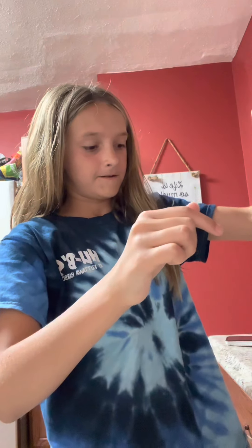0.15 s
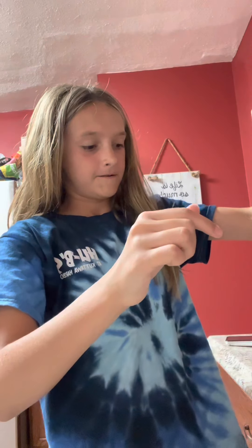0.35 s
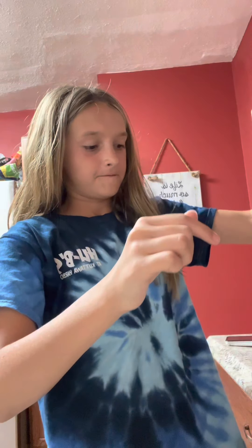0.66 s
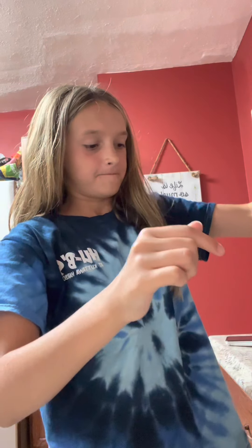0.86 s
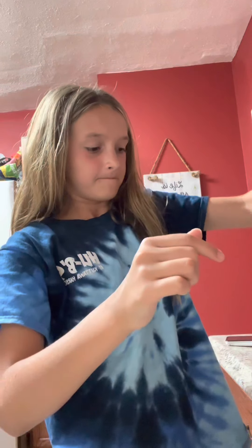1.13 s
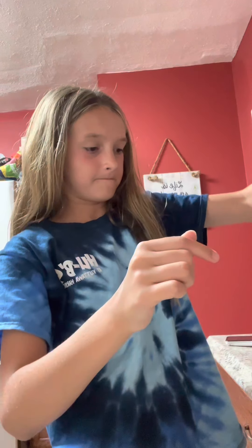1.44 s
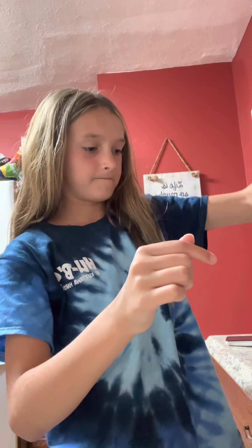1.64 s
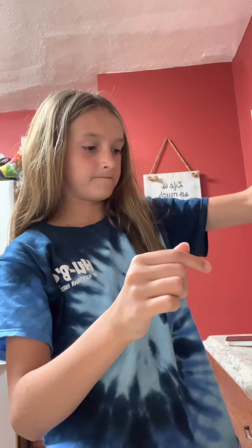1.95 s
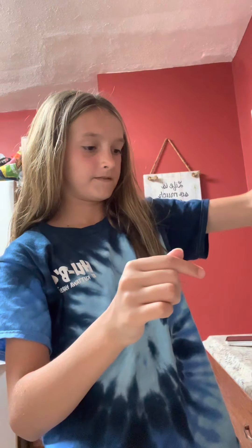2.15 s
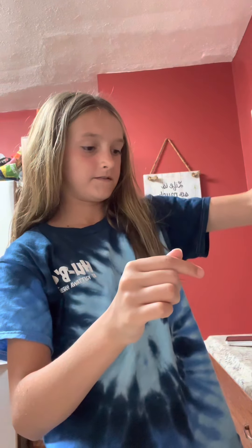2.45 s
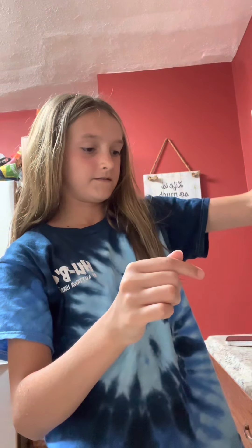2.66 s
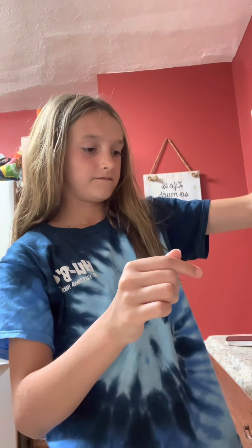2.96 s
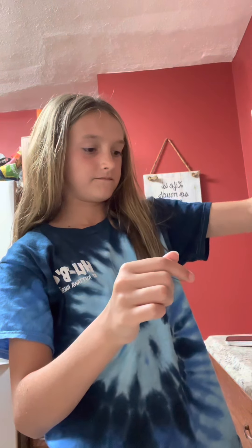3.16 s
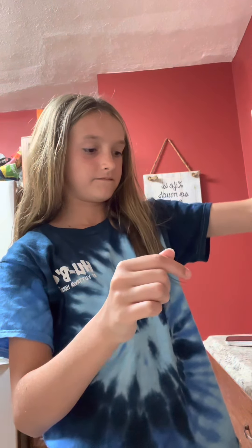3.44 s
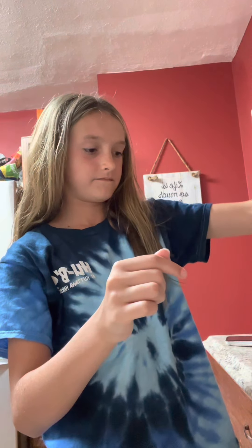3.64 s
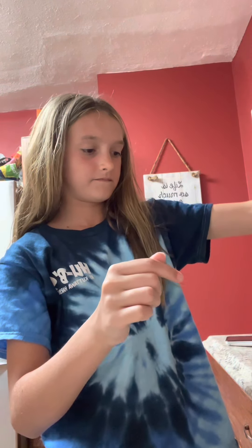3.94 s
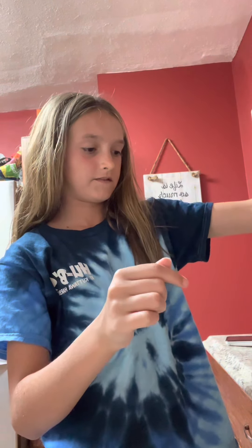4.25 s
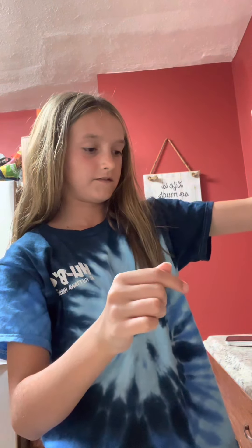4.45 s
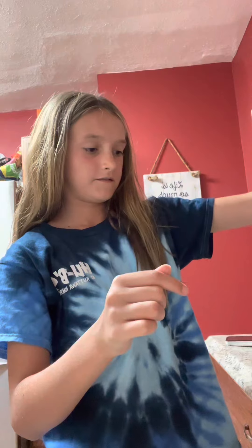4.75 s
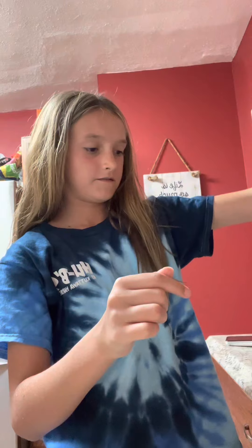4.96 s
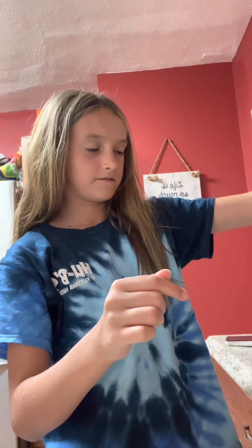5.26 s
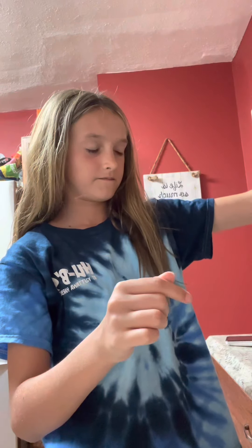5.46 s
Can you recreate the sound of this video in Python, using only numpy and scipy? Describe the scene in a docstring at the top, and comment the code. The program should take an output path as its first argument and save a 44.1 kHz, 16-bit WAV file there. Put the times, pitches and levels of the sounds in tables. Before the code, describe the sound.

Popcorn kernels rattle and knock in a shaken tub, busy rhythmic clusters thinning to scattered taps, then stopping over a steady appliance drone.

```python
"""In a kitchen, a tub of popcorn is shaken about six times a second, to the right of a phone.
Each stroke lands the heap on the wall as a cluster of kernels: noise bursts ring the wall modes and crackle.
Between strokes the heap slides and rustles; single hard kernels knock, and handfuls slip with a hiss.
An appliance drones behind as shaped noise; the left channel is weaker below 5 kHz and differs in phase."""
import sys
import numpy as np
from scipy import signal
from scipy.fft import rfft, irfft, next_fast_len
from scipy.io import wavfile
from scipy.ndimage import uniform_filter1d, map_coordinates

SR = 44100
rng = np.random.default_rng(int(sys.argv[2]) if len(sys.argv) > 2 else 0)


def dump(signal):
    """Clip the signal to [-1, 1] and save it as 16-bit WAV at the path in sys.argv[1]."""
    limited = np.clip(np.atleast_2d(signal).T, -1, 1)
    pcm = np.round(limited * 32767).astype(np.int16)
    wavfile.write(sys.argv[1], SR, pcm)


N = 246947
TIME_S = np.arange(N) / SR

# Appliance spectrum. Each row: frequency in Hz, relative density in dB per Hz.
DRONE_SPECTRUM = [(20, -16), (40, -38.5), (58, 1.5), (75, -11), (108, 2.5), (140, -5.5), (165, -9),
                  (260, -11), (400, -16), (800, -24), (1300, -24), (2500, -24), (4300, -42.5), (8000, -41),
                  (16000, -74)]
# Decay of the kitchen. Each row: frequency in Hz, time to fall 60 dB in s.
ROOM_DECAY = [(150, 0.24), (1000, 0.21), (5000, 0.33), (15000, 0.029)]
# Left channel against right; opposite in phase from 7.8 to 10.5 kHz.
# Each row: frequency in Hz, level in dB, likeness 0-1, phase lead in rad.
CHANNEL_RATIO = [(50, -.8, .998, 0), (170, -2, .975, 0), (340, -6.5, .9, -.2), (500, -11.5, .5, -.8),
                 (800, -9.5, .25, .8), (1300, -6, .45, 1.6), (1600, -8, .45, 1.1), (2600, -8, .84, 2.1),
                 (3100, -1.5, .58, 2.5), (4400, -1.5, .2, 3.9), (5500, 0, .65, 5.1), (6900, 0, .7, 4.5),
                 (7800, 0, 1, np.pi), (10500, 0, 1, np.pi), (11300, 0, .6, 1.9), (12500, 0, .85, .4),
                 (13200, 0, 1, 0)]
# Modes of the tub wall. Each row: frequency in Hz, width in Hz before a blow's damping, level in dB.
WALL_MODES = [(206, 57, -10), (294.5, 32.5, -5.5), (375, 54.5, -2.5), (412, 21, 1), (468.4, 25, -3),
              (588, 59, -2.5), (660.6, 48, -1.5), (702.5, 59, -4), (830, 86, -8.5), (1058, 87, -3),
              (1260, 505, -10), (1828, 300, -6), (2097, 195, -8), (2487, 462, -8.5)]
# Brittle flakes. Each row: frequency in Hz, relative density in dB per Hz.
CRACKLE_SPECTRUM = [(2000, -30), (3300, -4), (4400, -4), (5500, -7), (7700, -6), (9500, -5), (11000, -7),
                    (13000, -5), (16000, -8)]
# Sliding heap. Each row: frequency in Hz, relative density in dB per Hz.
RUSTLE_SPECTRUM = [(1000, -30), (2500, -3), (3600, 0), (4400, -3), (5200, -7), (6800, -9), (7700, -14),
                   (10000, -24), (16000, -40)]
# The heap slides. Each row: time in s, soft contacts in dB, hard contacts in dB,
# dry level in dB (the rustle).
SLIDE_LEVELS = [(0, -28.5, -31.5, -40.5), (.15, -43.5, -39.5, -49), (.35, -34.5, -36.5, -43.5),
                (.67, -41.5, -41.5, -49.5), (1.15, -37.5, -36, -43), (1.45, -44.5, -42, -48.5),
                (1.7, -45.5, -42, -46.5), (2.0, -42, -44.5, -52.5), (2.3, -43, -36.5, -44),
                (2.7, -42, -43, -52), (2.9, -51.5, -48, -51.5), (3.35, -46.5, -44.5, -54),
                (3.6, -39, -38, -46.5), (3.949, -46, -47.5, -50), (4.3, -40.5, -40.5, -46.5),
                (4.55, -48, -41.5, -51), (4.8, -46.5, -38.5, -43), (5.0, -52, -43, -47),
                (5.1, -62, -59.5, -58), (5.6, -68, -79, -67.5)]
# Handfuls slip down the wall. Each row: start in s, level in dB, fall in s, centre in Hz.
SLIPS = [(0.293, -43, 0.033, 3480), (1.049, -47.5, 0.16, 4730), (2.079, -43.5, 0.04, 4100),
         (2.201, -49.5, 0.055, 4240), (3.018, -44.5, 0.091, 3480), (3.559, -42, 0.03, 6630),
         (3.563, -48, 0.082, 3660), (3.561, -36.5, 0.033, 2380), (4.048, -44.5, 0.067, 3730),
         (4.052, -44.5, 0.11, 7560), (4.331, -51, 0.04, 3700), (4.868, -42.5, 0.09, 3600),
         (5.232, -43, 0.0066, 3100), (5.233, -45, 0.0069, 6960), (5.351, -53.5, 0.12, 3200),
         (5.351, -65.5, 0.11, 6170), (5.403, -48.5, 0.048, 1480), (5.41, -59, 0.043, 2400)]
# Single hard kernels. Each row: start in s, thud peak in dB, thud pitch in Hz, boom peak in dB,
# tap peak in dB, tap pitch in Hz, crackle in dB.
KERNELS = [(0.0363, -15, 523, -51.0, -28, 2030, -42), (0.0434, -14.5, 550, -42, -24, 1720, -49),
           (0.054, -13.5, 460, -45, -39, 1850, -44), (0.0654, -25, 470, -35.5, -22, 1560, -40),
           (0.0724, -19, 580, -44, -24, 1580, -38.5), (0.0891, -38, 490, -58.5, -25, 1670, -47),
           (0.1092, -30, 633, -45, -37, 1460, -53), (0.1627, -30, 600, -56, -29, 1870, -53),
           (0.2045, -26.0, 590, -52.5, -32.5, 1700, -45), (0.212, -27, 580, -29, -27, 2040, -44),
           (0.2208, -15, 595, -36, -21, 1700, -38), (0.23, -21.5, 555, -25, -22, 1990, -44.5),
           (0.2425, -24, 630, -40, -23, 2170, -45), (0.2553, -20.0, 500, -37, -28, 1860, -47),
           (0.2865, -18.5, 624, -34, -16, 1600, -46), (0.3276, -40.5, 580, -44, -26.0, 1240, -43),
           (0.3444, -27, 550, -30.0, -28, 2110, -45.5), (0.3605, -17, 510, -28, -27.5, 1870, -45.5),
           (0.3964, -14, 510, -28, -34, 1910, -40.5), (0.4162, -11.5, 580, -42, -27, 1590, -39),
           (0.4293, -26, 580, -33, -22, 1500, -41), (0.4391, -13.5, 527, -40, -28, 1810, -45),
           (0.452, -19, 497, -32, -22, 1670, -44), (0.4738, -29, 480, -38.0, -33, 1690, -44.0),
           (0.4947, -31, 540, -30, -31.5, 1990, -54), (0.5038, -28.0, 480, -51, -35, 1860, -53.0),
           (0.5325, -29, 500, -55.0, -36, 1580, -51.5), (0.5482, -26, 540, -43, -24, 1810, -44.5),
           (0.5618, -17, 560, -35, -24, 1780, -46.5), (0.5791, -18.5, 540, -40, -29, 1390, -40.5),
           (0.591, -22.5, 500, -47.5, -22, 1740, -51), (0.7293, -19.5, 560, -47, -35, 1630, -42),
           (0.7388, -17.5, 564, -47.0, -21, 1830, -39), (0.7443, -16.5, 450, -46, -24, 1670, -45.5),
           (0.752, -14, 480, -60, -28, 1730, -39), (0.7638, -25.5, 520, -35.0, -32, 1640, -36),
           (0.775, -25, 560, -19, -23, 1360, -41), (0.7868, -35, 510, -36, -45.0, 2020, -45.5),
           (0.9139, -16, 605, -55, -28, 1540, -45), (0.9247, -18, 526, -52, -19, 1690, -44.5),
           (0.936, -24, 530, -33, -18, 1610, -40), (0.9473, -22, 620, -38, -21, 1770, -48),
           (0.9551, -20, 620, -29, -24.0, 1630, -43.5), (0.9785, -37, 527, -60.5, -37, 1840, -49.5),
           (1.019, -20, 540, -47, -27, 2190, -45), (1.0356, -32.5, 580, -55.0, -34.5, 1930, -50),
           (1.0685, -29, 560, -45.0, -27.0, 1810, -38), (1.082, -24.5, 650, -44.0, -26.0, 2080, -45),
           (1.1002, -16, 507, -36, -23, 1610, -46.5), (1.1086, -16, 517, -47, -18.0, 1490, -45),
           (1.12, -38.0, 630, -26, -14, 1750, -42), (1.1245, -17, 490, -36.0, -22.0, 1530, -42),
           (1.142, -15.5, 550, -36, -30.5, 1650, -47), (1.1584, -39, 470, -30, -28, 2130, -41.5),
           (1.167, -42, 500, -51.0, -24.0, 1930, -31.5), (1.2183, -29.0, 670, -54.0, -26, 1920, -46),
           (1.2322, -21, 480, -23, -35, 1610, -43), (1.2606, -23.0, 576, -32, -31, 1630, -44),
           (1.2697, -29, 560, -41, -34, 1930, -50.5), (1.2946, -30, 554, -39, -40, 1950, -49),
           (1.3033, -40, 560, -52.0, -23.5, 1980, -45), (1.3196, -39, 580, -59.0, -32.5, 1990, -51.0),
           (1.3494, -38, 580, -37, -31, 1970, -52), (1.42, -24.5, 585, -32, -17, 1910, -44),
           (1.4287, -24, 500, -42.0, -22, 1990, -48), (1.4377, -23.5, 583, -54.0, -16, 1540, -54),
           (1.4468, -21.5, 530, -38, -37, 1780, -44), (1.4533, -17, 533, -32, -24, 1890, -39),
           (1.4649, -18, 507, -45, -29, 1840, -42), (1.4717, -21.5, 460, -40, -36.5, 1640, -41),
           (1.4861, -28, 540, -39, -41, 1330, -45), (1.5891, -25, 547, -45, -28, 2160, -49),
           (1.6065, -29, 477, -56.0, -25.5, 1880, -50), (1.646, -30.5, 550, -46.5, -39.5, 1810, -50.0),
           (1.7036, -30, 458, -40, -30, 1470, -52.5), (1.7352, -33, 530, -63.0, -39.0, 1670, -37),
           (1.7662, -28.5, 580, -44, -32, 1870, -50), (1.789, -28.0, 460, -36.0, -33, 1640, -45.5),
           (1.7997, -29, 460, -35, -27, 1960, -46), (1.8065, -22.5, 496, -35, -40, 2090, -50),
           (1.8224, -22, 420, -36, -38, 1910, -49.5), (1.8607, -35, 680, -49, -23, 1900, -49),
           (1.9296, -23, 590, -40.0, -34, 1660, -56.0), (1.9454, -20, 504, -58.0, -25.0, 1710, -47.5),
           (1.9624, -17.5, 496, -44.0, -22, 1830, -46), (1.982, -26, 506, -42.0, -44, 1780, -49.5),
           (2.047, -35, 570, -44.5, -40, 1700, -52.5), (2.0534, -29.5, 590, -59.5, -28, 1580, -46),
           (2.0997, -24, 590, -56.5, -34, 1780, -45), (2.1134, -20.5, 470, -37, -37.0, 1930, -48.5),
           (2.1229, -15.0, 500, -41, -16, 1830, -41), (2.1436, -35.0, 580, -35, -31, 1640, -52),
           (2.1484, -27, 550, -38, -36, 1970, -48), (2.165, -29, 510, -49.5, -34, 1970, -48.5),
           (2.1942, -29.5, 580, -58.5, -36, 1620, -44), (2.2015, -32, 620, -45, -29, 1670, -40),
           (2.2451, -29, 520, -50.5, -38, 1890, -44), (2.2868, -27, 540, -33.5, -28, 1660, -47),
           (2.3026, -24.5, 510, -23, -33, 1670, -45), (2.3185, -17, 575, -39, -22, 1700, -46),
           (2.3312, -18.5, 454, -30, -32, 1440, -47), (2.389, -36.5, 440, -40, -24, 1800, -41),
           (2.4148, -33, 490, -49.0, -28, 1950, -51), (2.4243, -23, 510, -36, -27, 1830, -47),
           (2.485, -25.0, 570, -60.5, -30, 1660, -45), (2.5028, -15.5, 522, -27, -30.0, 1710, -46),
           (2.5128, -19.5, 584, -56.5, -28, 1570, -44), (2.5388, -19, 523, -46.0, -35, 1900, -45),
           (2.7109, -23, 604, -27, -33, 1650, -46.5), (2.7188, -25.5, 540, -32, -33.5, 1730, -46.5),
           (2.7325, -22, 550, -46, -36, 1690, -45), (2.7716, -32, 590, -42.5, -29, 1590, -51.5),
           (3.0336, -29, 644, -49.0, -32, 2050, -48.5), (3.394, -28.5, 560, -52, -40, 1330, -57),
           (3.4343, -28.0, 480, -38, -36.0, 2050, -51), (3.46, -19.5, 596, -54.5, -28, 1650, -44),
           (3.4762, -18, 495, -40, -38, 1850, -43.5), (3.4831, -21.5, 450, -32.5, -39, 1750, -45),
           (3.5002, -29, 556, -27, -38, 1360, -54), (3.5272, -31, 470, -53.5, -35, 1900, -55),
           (3.5642, -38, 490, -40, -31, 2250, -51), (3.6175, -21, 470, -24, -39, 2130, -48),
           (3.6236, -23, 550, -34, -32, 1680, -47), (3.635, -17.5, 500, -42, -25, 1780, -43.5),
           (3.6475, -22, 560, -57, -35, 1940, -43), (3.6548, -29, 550, -40.0, -23, 1940, -42),
           (3.74, -36, 577, -38, -33, 1840, -52), (3.7845, -27.5, 460, -34, -36.0, 1740, -56),
           (3.7979, -22, 510, -42, -32, 1490, -50), (3.822, -24, 557, -42.5, -41, 1640, -54),
           (3.8428, -25.5, 550, -49, -38, 1590, -42), (3.8514, -24.5, 553, -44.5, -41, 1790, -51),
           (3.8635, -25.0, 480, -44, -40, 2180, -55.5), (3.9299, -31, 450, -49, -41, 1940, -55),
           (4.1296, -32, 560, -31, -27, 1630, -47.5), (4.1445, -21, 492, -44.5, -30, 1870, -47),
           (4.151, -13, 545, -41, -26, 1930, -40), (4.1609, -22, 560, -36, -23, 1660, -43),
           (4.1711, -19.5, 560, -35, -28.0, 2060, -55), (4.1908, -24.5, 575, -45.0, -45, 1890, -51),
           (4.2305, -25, 630, -35, -28.0, 1680, -31), (4.237, -26, 550, -37, -24, 1460, -41),
           (4.2437, -24, 500, -37, -27.5, 1600, -44.5), (4.3161, -23, 490, -46, -35.0, 2010, -51),
           (4.3325, -16.5, 505, -29, -25, 1590, -49), (4.3469, -23, 550, -59.5, -30.5, 1850, -46),
           (4.382, -26.5, 480, -51.5, -35, 1250, -47.5), (4.3891, -26.5, 580, -52, -34.0, 1650, -43),
           (4.4066, -24, 480, -36, -42, 2090, -41), (4.434, -26, 460, -55, -44, 1490, -47),
           (4.4525, -25, 560, -40, -29.5, 1350, -54), (4.4662, -27, 597, -57.5, -34, 1590, -35),
           (4.4846, -34, 550, -46, -35.5, 1670, -49), (4.5374, -29, 517, -40, -37.5, 1870, -55),
           (4.5454, -27.5, 576, -53.5, -26, 1230, -49.5), (4.5579, -36, 530, -23, -25.5, 2050, -47),
           (4.5665, -19, 450, -24, -30.5, 1480, -52.0), (4.6002, -26.5, 530, -41, -36, 1360, -48),
           (4.627, -27.5, 560, -48, -26, 1910, -48.5), (4.6796, -30, 560, -57.0, -35, 1580, -42),
           (4.7608, -30, 580, -64.0, -32, 1530, -47), (4.769, -28.5, 590, -51, -37.0, 1870, -48.5),
           (4.7777, -32, 500, -47, -39.0, 1930, -45), (4.7931, -24.5, 530, -49.5, -32, 1710, -48),
           (5.233, -39, 470, -53, -29, 2080, -46), (5.2362, -29, 564, -45, -31, 2050, -46.5),
           (5.406, -54, 470, -65.5, -45, 1730, -59)]
# The heap lands. Each row: time in s, thud in dB before LANDING_GAIN_DB, tap and crackle in dB
# re that thud (tap before half of LANDING_GAIN_DB), rise in s, fall in s.
LANDINGS = [(0.045, -32, -2, -15, 0.0061, 0.043), (0.226, -22, -4, -20.5, 0.019, 0.029),
            (0.29, -32, 2.5, -33, 0.0098, 0.0028), (0.361, -32, -14, -16, 0.012, 0.018),
            (0.415, -22.5, -2, -20.5, 0.027, 0.035), (0.566, -27.5, 0, -16, 0.014, 0.011),
            (0.742, -33.5, 3.5, -15.5, 0.021, 0.047), (0.925, -29, 1.5, -15.5, 0.018, 0.019),
            (1.107, -29.5, 1.5, -12, 0.037, 0.044), (1.229, -32, -3.5, -26, .012, 0.054),
            (1.44, -31, 1, -14.5, 0.028, 0.032), (1.61, -32.5, -1, -19, 0.014, 0.024),
            (1.802, -33, -2.5, -11.5, 0.042, 0.01), (1.965, -29.5, -0.5, -19.5, 0.019, 0.012),
            (2.052, -46.5, 2.5, -41, 0.026, 0.01), (2.126, -26.5, -6, -20.5, 0.032, 0.019),
            (2.325, -26.5, -11, -22, 0.058, 0.011), (2.423, -34.5, -4, -10.5, 0.041, 0.0037),
            (2.508, -32.5, 1, -16, 0.059, 0.026), (2.618, -38.5, 1.5, -11, 0.022, 0.039),
            (2.717, -35.5, -1.5, -12.5, 0.035, 0.042), (3.037, -44.5, 0, -8.5, 0.016, 0.052),
            (3.278, -35, -7, -21, 0.052, 0.025), (3.482, -24.5, -10, -23, 0.02, 0.0074),
            (3.632, -30.5, -4, -27.5, 0.022, 0.02), (3.74, -42.5, -3.5, -30, 0.012, 0.011),
            (3.821, -31.5, -5, -18.5, 0.027, 0.023), (4.154, -26, -6.5, -21.5, 0.026, 0.027),
            (4.24, -36.5, 1, -23, 0.035, 0.021), (4.334, -38, 1, -11, 0.04, 0.027),
            (4.401, -31, -4, -15.5, 0.022, 0.058), (4.565, -32.5, -8, -19.5, 0.026, 0.095),
            (4.684, -40, 2, -14, 0.014, 0.042), (4.785, -36.5, -18, -9, 0.027, 0.015),
            (4.885, -42.5, 6, -2, 0.016, 0.043)]
# Depth of the landings. Each row: time in s, lowest modes in dB re thud before LANDING_GAIN_DB.
LANDING_BOOM = [(0, -9.5), (1.0, -10), (1.8, -8.5), (2.6, -7.5), (3.5, -9), (3.9, -7), (4.5, -7),
                (5.0, -15)]

DRONE_DB, ROOM_DB = -43.5, -11.5
TOP_HZ = 15760
AFTER_S, AFTER_DB = 0.14, -21  # slide after a landing: length, level re the landing
LANDING_GAIN_DB = -6.5  # level of the landings' thuds; half of it for taps
SLIDE_BOOM_DB, SLIDE_CRACKLE_DB = -4.5, -5.5  # re soft contacts, re rustle
THUD_RISE_S, TAP_RISE_S, BOOM_RISE_S = 0.002047, 0.000982, 0.00281
DAMPING, TAP_DAMPING = 1.27, 0.5  # factor on mode width: under the heap's weight, freer for a tap
REACH, TAP_REACH = 0.27, 0.38  # log frequency ratio over which a blow stirs modes
VARY_DB, FAR_DB = 2.5, -4  # scatter per mode, peak on the phone's far side
CRACKLE_S, BOOM_HZ = 0.0036, 280


def amp(db):
    """Amplitude factor of a level in dB."""
    return 10 ** (np.asarray(db) / 20)


def unit(x):
    """x at an rms of one."""
    return x / np.sqrt(np.mean(x ** 2) + 1e-20)


def along(points, hz):
    """Columns of (Hz, value, ..) rows, interpolated on a log frequency axis."""
    point_hz, *columns = np.transpose(points)
    return [np.interp(np.log(hz + 1), np.log(point_hz), c) for c in columns]


def spectrum(points):
    """Amplitude response of a (Hz, dB) table."""
    return lambda hz: amp(along(points, hz)[0])


def filtered(x, response):
    """x times a complex response of frequency."""
    size = next_fast_len(N + SR // 2)
    return irfft(rfft(x, size) * response(np.fft.rfftfreq(size, 1 / SR)), size)[..., :N]


def through(drive, body):
    """A drive coloured by a body that keeps the power of white noise."""
    power = np.mean(np.abs(body(np.linspace(0, SR / 2, num=4096))) ** 2)
    return filtered(drive, body) / np.sqrt(power)


def wobble(rate_hz):
    """A smooth random curve, rate_hz knots a second."""
    knots = rng.standard_normal(int(N * 200 / SR) + 4)
    return map_coordinates(knots, [TIME_S * rate_hz])


def scatter():
    """Two unrelated noises: what reaches the phone directly, what comes round to its far side."""
    return rng.standard_normal((2, N))


def drone():
    """The appliance: a fan's rumble with air noise, slightly unsteady."""
    air = filtered(scatter(), spectrum(DRONE_SPECTRUM))
    return amp(DRONE_DB + 0.15 * wobble(rate_hz=3.6)) * unit(air)


def kitchen(x):
    """Reverberation as noise, each frequency dying at its own speed.

    A new random tail is drawn every third of a second, so the reverberation stays smooth."""
    out, step = np.zeros((2, N + 2 * SR)), SR // 3
    for start in range(0, N, step):
        hz, t_s, z = signal.stft(rng.standard_normal((2, SR // 2)), SR, nperseg=256)
        decay = amp(-60 * t_s / along(ROOM_DECAY, hz)[0][:, None])
        tail = signal.istft(z * decay, SR, nperseg=256)[1]
        tail = tail / np.linalg.norm(tail[0])
        answer = signal.fftconvolve(x[:, start:start + step], tail, axes=1)
        out[:, start:start + answer.shape[1]] += answer
    return out[:, :N]


def channels(direct, around):
    """Right is the direct sound; left mixes it with the other, by level, likeness and phase per frequency."""
    def left(hz):
        db, alike, lead_rad = along(CHANNEL_RATIO, hz)
        shared = alike * np.exp(1j * lead_rad)
        return amp(db) * np.array([shared, np.sqrt(1 - alike ** 2)])
    return np.array([filtered(np.array([direct, around]), left).sum(axis=0), direct])


def patter(per_second, spread_db, contact_s):
    """Strength of contact: kernels at random moments, of random size, each dying away."""
    sizes = amp(spread_db * rng.exponential(size=N))
    hits = sizes * (rng.random(N) < per_second / SR)
    keep = np.exp(-1 / (contact_s * SR))
    return unit(signal.lfilter([1], [1, -keep], hits))


def tub(low_hz, high_hz):
    """The response of the wall modes between two frequencies: resonances of alternating sign."""
    def response(hz):
        total = 0
        for k, (mode_hz, width_hz, db) in enumerate(WALL_MODES):
            if low_hz < mode_hz < high_hz:
                loss = 1j * hz * width_hz
                total = total + (-1) ** k * amp(db) * loss / (mode_hz ** 2 - hz * hz + loss)
        return total
    return response


def sounded(thud, boom, tap, crackle):
    """Weight drives the lowest wall modes, soft contacts the middle, hard ones the highest; flakes crackle."""
    low = through(boom, tub(0, 340))
    middle = through(thud, tub(340, 800))
    high = through(tap, tub(800, 4000))
    return low + middle + high + through(crackle, spectrum(CRACKLE_SPECTRUM))


def shifting(x, depth_db):
    """The moving heap and gripping hand damp the wall now here, now there: its colour changes in patches."""
    z = signal.stft(x, nperseg=512)[2]
    field = uniform_filter1d(rng.standard_normal(z.shape[1:]), size=5, axis=0)
    field = uniform_filter1d(field, size=8, axis=1)
    return signal.istft(z * amp(depth_db * unit(field)), nperseg=512)[1][:, :N]


def slide():
    """Many light contacts at once: a dense, slightly uneven rustle."""
    s, soft_db, hard_db, dry_db = np.transpose(SLIDE_LEVELS)

    def contacts(db):
        level = amp(np.interp(TIME_S, s, db) + wobble(rate_hz=18))
        return level * patter(2500, spread_db=4.0, contact_s=0.0092) * scatter()
    thud = contacts(soft_db)
    boom = contacts(soft_db + SLIDE_BOOM_DB)
    tap = contacts(hard_db)
    crackle = contacts(dry_db + SLIDE_CRACKLE_DB)
    rustle = contacts(dry_db)
    return sounded(thud, boom, tap, crackle) + through(rustle, spectrum(RUSTLE_SPECTRUM))


def slips():
    """Each slip starts at once and hisses in a broad band of its own."""
    out, grain = np.zeros((2, N)), patter(2500, spread_db=2.5, contact_s=0.003)
    for s, db, fall_s, centre_hz in SLIPS:
        def band(hz):
            loss = .5j * hz * centre_hz
            return (loss / (centre_hz ** 2 - hz * hz + loss)) ** 2
        shape = (TIME_S > s) * np.exp(-((TIME_S - s) / fall_s) ** 2)
        out += through(amp(db) * shape * grain * scatter(), band)
    return out


def knock(t_s, pitch_hz, rise_s, damping, reach):
    """A blow rings the modes near its pitch, in step and with new strengths; out of step on the far side."""
    hz, width_hz, db = np.transpose(WALL_MODES)[..., None]
    chance = rng.standard_normal((2, len(WALL_MODES), 1))
    stirred = np.exp(-(np.log(hz / pitch_hz) / reach) ** 2)
    decay = np.exp(-np.pi * damping * width_hz * t_s)
    strength = amp(db + VARY_DB * chance[0]) * stirred * decay
    phase_rad = np.pi * chance[1] * [[[0]], [[1]]]  # direct side, far side
    modes = strength * np.sin(2 * np.pi * hz * (t_s - rise_s) + phase_rad)
    ring = modes.sum(axis=1) * np.minimum(t_s / rise_s, 1)
    return ring / np.abs(ring).max(axis=1, keepdims=True) * amp([[0], [FAR_DB]])


def kernels():
    """A hard kernel strikes the wall: thud, boom and tap, with a few milliseconds of crackle."""
    wall, flakes = np.zeros((2, N + SR)), np.zeros((2, N + SR))
    t_s = np.arange(SR // 30) / SR
    for s, thud_db, thud_hz, boom_db, tap_db, tap_hz, crackle_db in KERNELS:
        span = slice(round(s * SR), round(s * SR) + len(t_s))
        wall[:, span] += amp(thud_db) * knock(t_s, thud_hz, THUD_RISE_S, DAMPING, REACH)
        wall[:, span] += amp(boom_db) * knock(t_s, BOOM_HZ, BOOM_RISE_S, DAMPING, REACH)
        wall[:, span] += amp(tap_db) * knock(t_s, tap_hz, TAP_RISE_S, TAP_DAMPING, TAP_REACH)
        burst = np.exp(-t_s / CRACKLE_S) * rng.standard_normal((2, len(t_s)))
        flakes[:, span] += amp(crackle_db) * burst
    return wall[:, :N] + through(flakes[:, :N], spectrum(CRACKLE_SPECTRUM))


def shakes():
    """Kernels arrive in a cluster with a steep front, then settle; small bright contacts are the densest."""
    power = np.zeros((4, N))
    for s, db, tap_db, crackle_db, rise_s, fall_s in LANDINGS:
        away_s = np.abs(TIME_S - s)
        after = amp(AFTER_DB) ** 2 * np.exp(-(away_s / AFTER_S) ** 2)
        settle = np.exp(-(away_s / fall_s) ** 2.3) + after
        shape = np.where(TIME_S < s, np.exp(-(away_s / rise_s) ** 4), settle)
        boom_db = np.interp(s, *np.transpose(LANDING_BOOM))
        power += amp([[db], [db + boom_db], [db + tap_db], [db + crackle_db]]) ** 2 * shape
    thud, boom, tap, crackle = np.sqrt(power)
    heavy = patter(900, spread_db=0.92, contact_s=0.0028)
    light = patter(1500, spread_db=2.1, contact_s=0.0059)
    thud = amp(LANDING_GAIN_DB) * thud
    tap = amp(LANDING_GAIN_DB / 2) * tap
    return sounded(thud * heavy * scatter(), boom * heavy * scatter(),
                   tap * light * scatter(), crackle * light * scatter())


def scene():
    """Popcorn, the kitchen's answer and the drone, spread over two channels."""
    popcorn = shifting(shakes() + slide(), depth_db=1.6) + slips() + kernels()
    answer = amp(ROOM_DB) * kitchen(popcorn)
    direct, around = popcorn + answer + drone()
    return channels(direct, around)


def record(dry):
    """The phone keeps nothing above its band limit."""
    return filtered(dry, lambda hz: hz < TOP_HZ)


dry = scene()
out = record(dry)
dump(out)
```